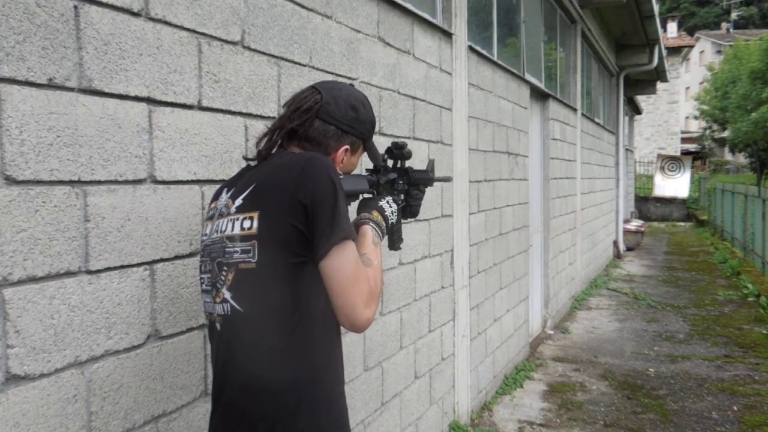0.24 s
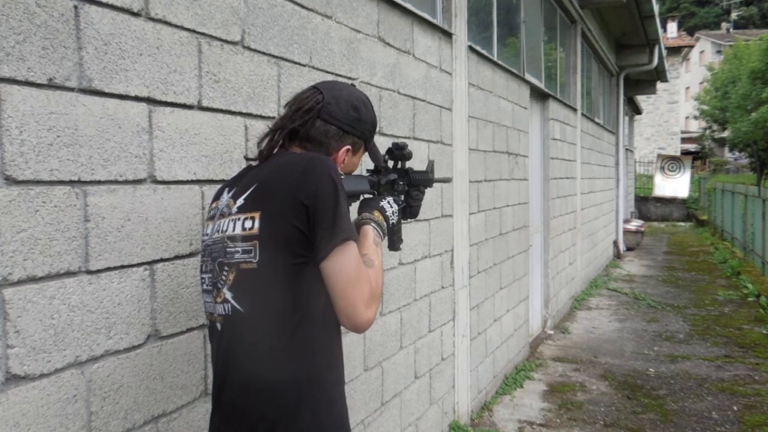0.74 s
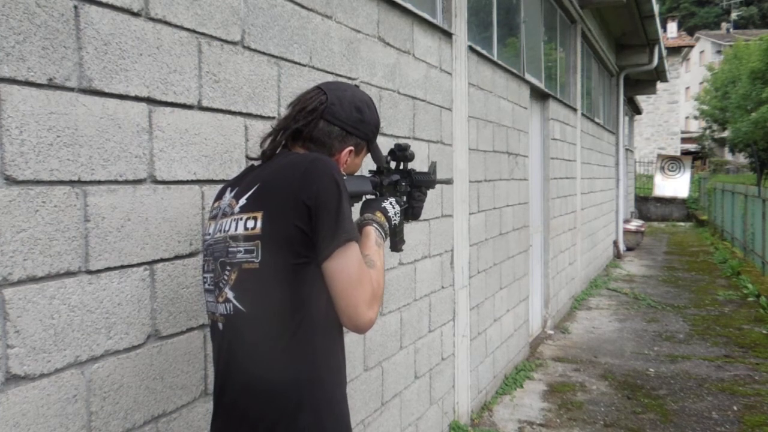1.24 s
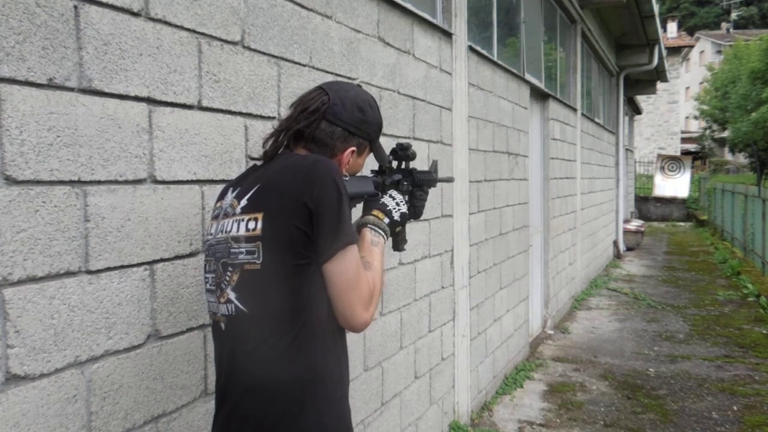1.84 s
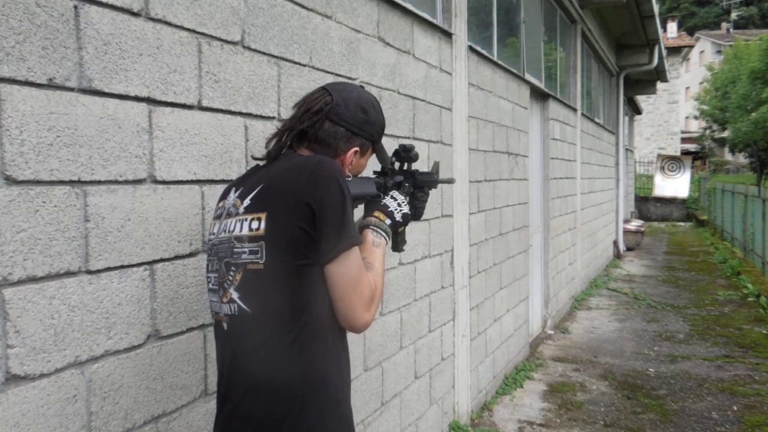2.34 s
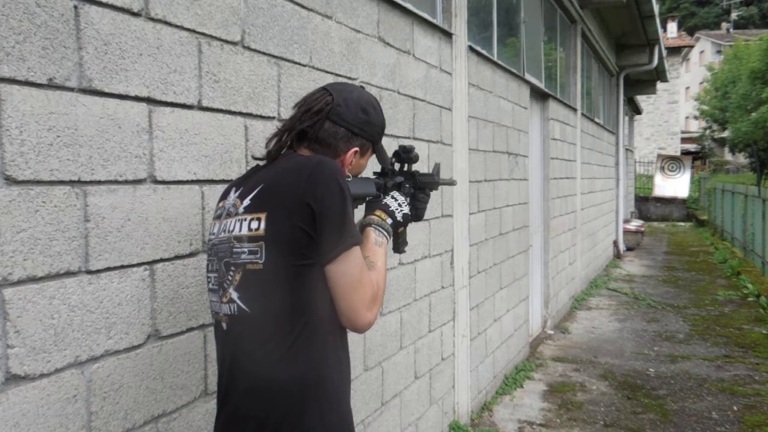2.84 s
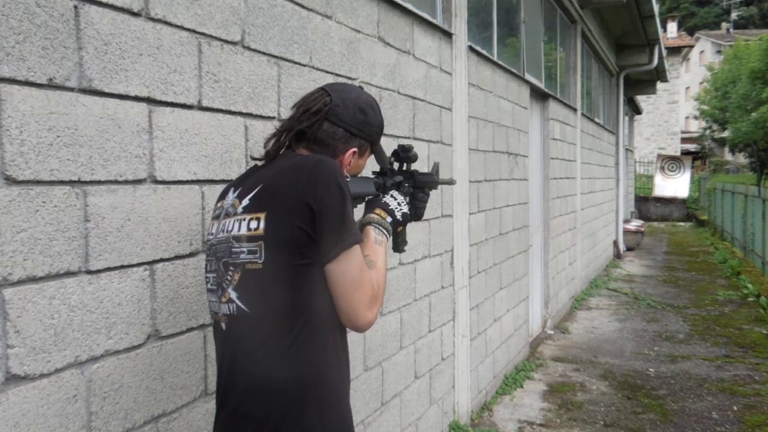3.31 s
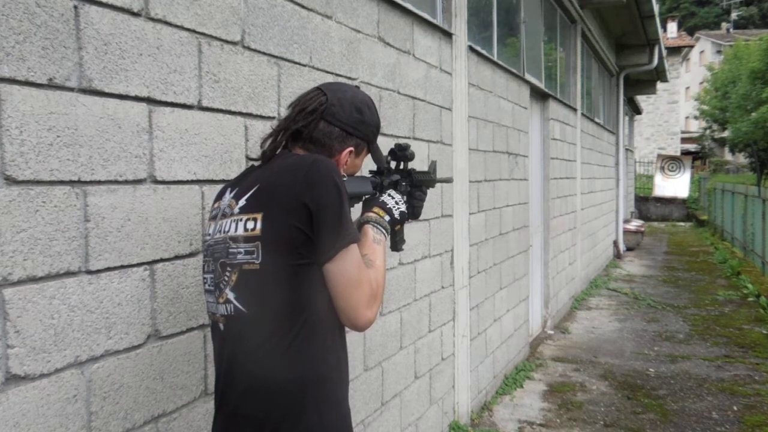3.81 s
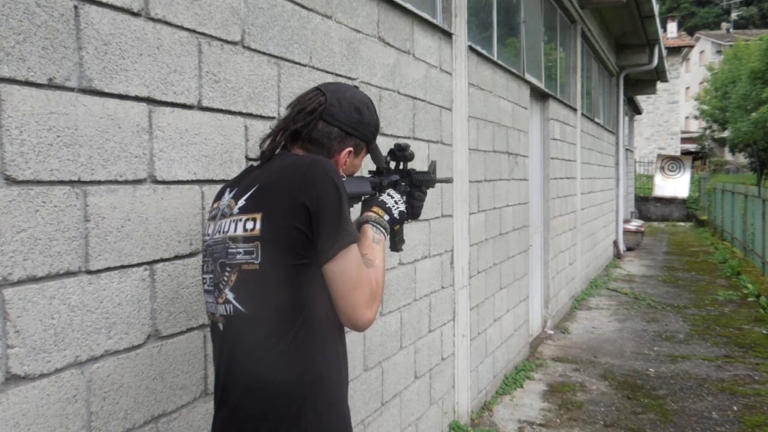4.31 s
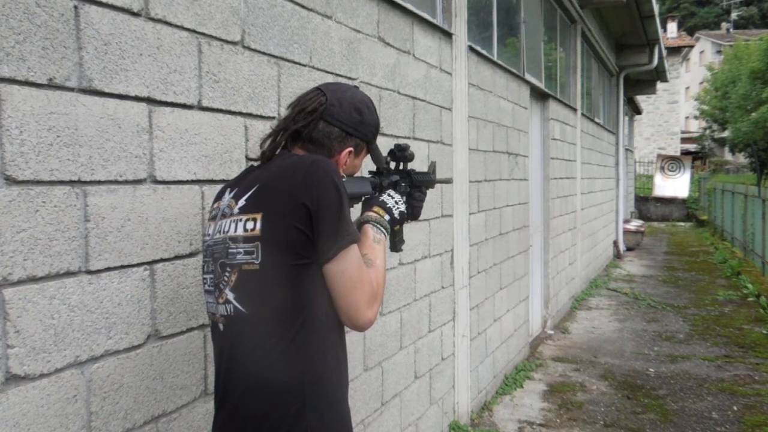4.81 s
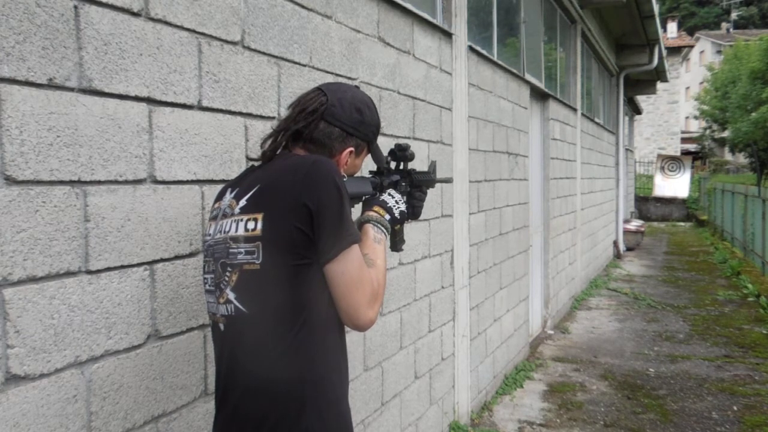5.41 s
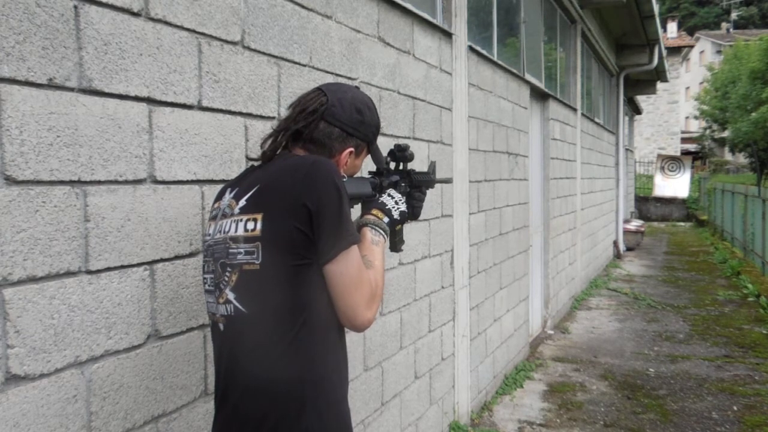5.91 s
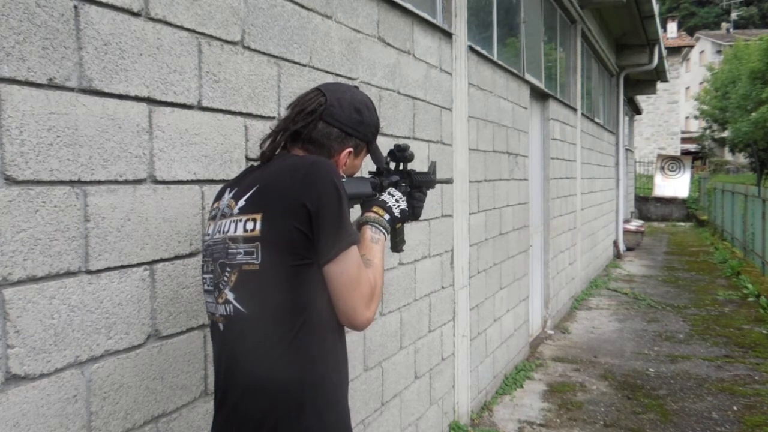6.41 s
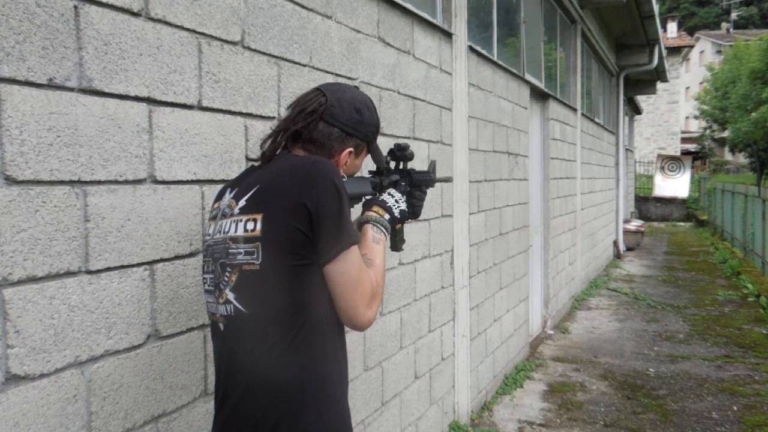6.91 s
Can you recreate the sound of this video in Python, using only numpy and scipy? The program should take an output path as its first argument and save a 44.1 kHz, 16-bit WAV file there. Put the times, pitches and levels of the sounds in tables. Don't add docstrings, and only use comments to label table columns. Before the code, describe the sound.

Outdoors in an alley beside a block wall, a close electric airsoft rifle fires nine brisk single shots, each a gear whirr, sharp crack and clatter. Distant pellet smacks follow. After a pause with a faint engine drone come four rapid bursts, two more shots and a final trigger click. The microphone is near the shooter; soft outdoor hum swells between volleys.

```python
import sys
import numpy as np
from scipy import signal
from scipy.fft import rfft, irfft, next_fast_len
from scipy.io import wavfile
from scipy.ndimage import uniform_filter1d

SR = 44100
rng = np.random.default_rng(int(sys.argv[2]) if len(sys.argv) > 2 else 0)


def amp(db):
    return 10 ** (np.asarray(db, float) / 20)


def write(x):
    x = np.atleast_2d(x).T
    wavfile.write(sys.argv[1], SR, np.round(np.clip(x, -1, 1) * 32767).astype(np.int16))


N = 315315
LEAD = SR // 10
CYCLE_S = .0614
SLOW_START_S = .0012
THUMP_SHARE = 0.74
SHAKE_DB = 2.0
EDGE_HZ = 14130

# (f/Hz, level/dB)
HUM_COLOUR = [(12, -17), (20, 4.5), (75, -4.5), (119, -1), (152, -3.5), (236, -7), (337, -2), (376, -14.5),
              (431, -4.5), (567, -14.5), (809, -11), (980, -15.5), (14000, -34.5)]
# (f/Hz, level/dB)
HUM_SIDE = [(60, -9.5), (180, -18.5), (540, -16.5), (1640, -13.5), (4920, -4.5), (14800, 3)]
# (level at rest/dB, drop per slam/dB, recovery/s)
HUM_GAIN = (-46, 4.43, 0.51)
# (t/s, f/Hz, level/dB)
ENGINE_NOTE = [(1.6, 164, -67), (1.604, 166, -64), (1.804, 173.5, -49), (1.826, 164, -57), (1.9, 162, -54),
               (1.966, 161.6, -70), (1.986, 175.7, -44.5), (2.12, 162, -64)]

# (t/s, snap level/dB, ringing tail level over snap/dB)
SINGLE_HITS = [(0.0856, -10, -17), (0.2436, -9.5, -19.5), (0.438, -10.5, -22), (0.5904, -13.5, -14.5),
               (0.7512, -13, -16), (0.9266, -13, -15.5), (1.1117, -9, -17.5), (1.264, -10, -15.5),
               (1.446, -12, -17), (1.6143, -15.5, -14.5), (1.79, -16, -12.5), (1.9464, -14.5, -11.5)]
# (first t/s, last t/s, snap level/dB, first tail level over snap/dB, last tail level over snap/dB)
BURST_HITS = [
    (3.2378, 3.5387, -12.5, -15, -12),
    (4.2326, 4.475, -10, -14.5, -14.5),
    (5.17, 5.412, -12.5, -15.5, -9.5),
    (6.113, 6.4187, -12, -16, -11.5),
]
# (t/s, level/dB)
STRAY_TICKS = [
    (0.1254, -16),
    (1.309, -36),
    (2.1944, -41),
]
# (f/Hz, level/dB)
SNAP_COLOUR = [(590, -35), (1000, -22), (1560, -27), (2580, -12), (2980, -23.5), (6460, -15), (9300, -5.5),
               (11000, 0.5), (13100, -3.5), (14000, -4.5)]
# (f/Hz, level/dB)
ALLEY_COLOUR = [(120, -48), (200, -11), (306, -2.5), (522, -10), (906, -11.5), (1250, -9), (1750, -4),
                (2130, -15.5), (2450, -5), (2830, -6), (6400, -6), (10200, -3), (14000, -5)]
# (f/Hz, level/dB)
YARD_COLOUR = [(150, -28), (400, 0.5), (1000, 3.5), (1600, 2), (2600, -2.5), (6000, -14.5), (14000, -38)]
# (f/Hz, level/dB, time to fade by 60 dB t/s)
TARGET_NOTES = [(299.5, -1.5, 1), (787, -2, 1), (1065, 4.5, 0.29), (1515, 2.5, 0.25), (1510, 0, 0.53),
                (1690, 8, 0.69), (1820, -1, 0.24), (2500, 7, 0.45), (2650, -12, .3), (3550, 5, 0.6),
                (3378, -24, 0.39), (3800, -0.5, 0.34)]
# (f/Hz, level/dB)
FAR_WIDTH = [(60, 8), (130, -34), (290, -35.5), (640, -35), (1400, -29), (4300, -31), (6300, -5),
             (14800, -1)]

# (delay t/s, level over crack/dB)
ECHOES = [
    (0.07, -35.5),
    (0.13, -43),
]
# (f/Hz, level/dB)
ECHO_COLOUR = [(300, -41), (650, -7.5), (960, -0.5), (1500, -9.5), (2600, -13), (5000, -24)]
# (t/s, level/dB)
RATTLES = [(3.1944, -43), (5.0875, -33.5), (5.145, -44), (6.0581, -42), (6.074, -39), (6.0895, -33),
           (7.093, -26)]
# (f/Hz, level/dB)
RATTLE_COLOUR = [(400, -29), (1300, -5), (3000, -6), (4500, -6.5), (9000, -36)]

# (t/s, tick level/dB)
PULLS = [(0.077, -22), (0.2448, -23), (0.419, -26.5), (0.601, -30), (0.759, -28), (0.9373, -33),
         (1.106, -23), (1.284, -25.5), (1.437, -27), (2.733, -10), (3.7314, -23), (4.6733, -24),
         (5.6125, -22.5), (6.751, -17.5), (6.979, -22)]
# (t/s, tick level/dB)
LAST_PULL = (7.158, -17.5)
# (time before slam t/s, level/dB, width/s)
TURN_BUMPS = [(0.03, 7, 0.0036), (0.0081, 7, 0.003)]
# (f/Hz, level/dB)
WHIRR_COLOUR = [(120, -69), (200, -25), (430, -8.5), (613, -10.5), (786, 2), (1040, -5), (1180, 1),
                (1290, -5.5), (2590, 0), (3040, -2), (3440, 4), (6070, -4.5), (14000, -1.5)]
# (f/Hz, level/dB)
PICK_UP_COLOUR = [(180, -59), (300, -25), (1020, -10), (2390, -5), (4120, 0.5), (6070, -5), (7240, -26),
                  (9370, -3.5), (14000, -10)]
# (rise t/s, hold t/s, time to fade by 60 dB t/s)
PICK_UP_SHAPE = (.0005, .002, .03)

# (t/s, crack level/dB)
SINGLES = [(0.135, -3.5), (0.3021, -5), (0.4767, -6.5), (0.66, -8), (0.819, -7.5), (0.9961, -7),
           (1.165, -4), (1.3411, -6), (1.498, -8), (6.81, 4), (7.0384, 1.5)]
# (first slam t/s, last slam t/s, first crack level/dB, last crack level/dB)
BURSTS = [
    (2.7882, 3.095, 8, -6),
    (3.7925, 4.0365, 0.6, -5),
    (4.733, 4.9777, -4.5, -6.5),
    (5.674, 5.979, 2, -5),
]
# (t/s, crack level/dB, clatter level over crack/dB)
EARLY_SLAM = (-0.035, -0.5, -2.8)
# (clatter, whirr, thump level over crack/dB)
FROM_REST = (-11.5, -20.5, -23)
# (clatter, whirr, thump level over crack/dB)
AT_SPEED = (-10, -16.5, -22.5)
# (f/Hz, level/dB)
CRACK_COLOUR = [(180, -26), (300, -57.5), (1450, -14), (1910, -7.5), (2630, -10), (3750, -10.5), (5080, -4),
                (7240, -9.5), (8500, -1.5), (9220, 0), (9990, -4), (10700, -3), (14000, -2)]
# (rise t/s, hold t/s, time to fade by 60 dB t/s)
CRACK_SHAPE = (.0007, .0017, .02)
# (f/Hz, level/dB)
CLATTER_COLOUR = [(120, -34.5), (200, -3.5), (541, -5.5), (786, -0.5), (1460, -3), (1720, 3.5), (2130, 0),
                  (3500, 3.5), (3890, -2.5), (4820, 2.5), (7510, -3), (8360, -1), (14000, 0)]
# (f/Hz, level/dB, time to fade by 60 dB t/s)
BODY_NOTES = [(67, -51, 0.041), (101.3, -0.5, 0.18), (121, -6.5, 0.24), (201.7, 4.5, 0.1), (437, 1.5, 0.14),
              (647, -6, 0.16), (722, 1.5, 0.084), (845, -9, 0.17), (1136.5, 2, 0.19), (1484, -1, 0.13)]
# (f/Hz, level/dB, time to fade by 60 dB t/s)
SHELL_NOTES = [(745, -13, .03), (1100, -9, .04), (1452, -9, .05), (2473, -9, .04), (3069, -10, .03),
               (3442, -11, .03), (8445, -2, .025), (9110, -9, .015), (9990, -9, .015), (11800, -8, .012),
               (12500, -7, .012), (13675, -4, .012)]
# (f/Hz, level/dB)
RIFLE_WIDTH = [(60, -11.5), (130, -21), (290, -33), (640, -57), (1400, -70), (5000, -47), (7400, -10),
               (14800, -13.5)]
# (f/Hz, level/dB)
LEAN = [(60, .4), (200, 0), (6000, 0), (7600, -2.1), (14800, -1.8)]


def read(points, hz):
    f, value = np.transpose(points)
    return np.interp(np.log(hz + 1), np.log(f + 1), value)


def colour(points):
    db = read(points, abs(np.fft.fftfreq(4096, 1 / SR)))
    spectrum = np.exp(np.conj(signal.hilbert(np.log(amp(db)))))
    return np.fft.ifft(spectrum).real[:2048]


def evened(x):
    return x / np.sqrt(np.mean(x ** 2) + 1e-20)


def summed(*shapes):
    longest = max(map(len, shapes))
    return sum(np.pad(shape, (0, longest - len(shape))) for shape in shapes)


def struck(s, db, shape):
    train = np.zeros(N + 3 * LEAD)
    np.add.at(train, LEAD + np.round(np.asarray(s) * SR).astype(int), amp(db))
    return signal.oaconvolve(train, shape)[LEAD:LEAD + N]


def fading(rise, hold, t60, after=0.):
    t = np.maximum(np.arange(round((after + hold + t60) * SR)) / SR - after, 0)
    return (1 - np.exp(-t / rise)) ** 2 * amp(-120 * np.maximum(t - hold, 0) / t60)


def burst(s, db, power, points, grit_db, wide):
    fine, coarse = rng.standard_normal((2, N))
    fine = evened(uniform_filter1d(fine, size=40))
    coarse = evened(uniform_filter1d(coarse, size=220))
    grit = amp(grit_db * evened(fine + 1.45 * coarse))
    envelope = np.sqrt(np.maximum(struck(s, 2 * np.asarray(db), power), 0)) * evened(grit)
    mid, side = envelope * rng.standard_normal((2, N))
    taps = colour(points)
    side_taps = np.convolve(taps, colour(wide))
    mid = signal.oaconvolve(mid, taps)[:N]
    side = signal.oaconvolve(side, side_taps)[:N]
    return np.array([mid, side]) / np.linalg.norm(taps)


def ring(modes, rise):
    t = np.arange(SR // 2) / SR
    sound = sum(amp(db - 60 * t / t60) * np.sin(2 * np.pi * hz * t) for hz, db, t60 in modes)
    sound *= 1 - np.exp(-(t / rise) ** 2)
    return sound / abs(sound).max()


def knocked(s, db, modes, rise, detune=.012):
    out = np.zeros(N + 2 * SR)
    draws = rng.standard_normal((len(s), 2, len(modes)))
    hz, mode_db, t60 = np.transpose(modes)
    for at, level_db, (mix, tune) in zip(s, db, draws):
        sound = ring(zip(hz * (1 + detune * tune), mode_db + SHAKE_DB * mix, t60), rise)
        out[LEAD + round(at * SR):][:len(sound)] += amp(level_db) * sound
    return out[LEAD:LEAD + N]


def spread_out(first, last, first_db, last_db):
    count = round((last - first) / CYCLE_S) + 1
    return np.linspace([first, first_db], [last, last_db], count)


def slams():
    rows = [(*row, *FROM_REST) for row in SINGLES]
    for volley in BURSTS:
        (s, db), *rest = spread_out(*volley)
        rows.append((s, db, *FROM_REST))
        rows += [(s + SLOW_START_S, db, *AT_SPEED) for s, db in rest]
    return rows


def hits():
    rows = list(SINGLE_HITS)
    for first, last, db, *tails in BURST_HITS:
        rows += [(s, db, tail_db) for s, tail_db in spread_out(first, last, *tails)]
    return rows


def hum():
    hz = np.fft.rfftfreq(N, 1 / SR)
    mid, side = rfft(rng.standard_normal((2, N))) * amp(read(HUM_COLOUR, hz))
    low = np.sqrt(2 * np.sum(abs(mid[(hz > 30) & (hz < 400)]) ** 2)) / N
    pair = irfft(np.array([mid, side * amp(read(HUM_SIDE, hz))]), N) / low
    waver_db = .8 * evened(uniform_filter1d(rng.standard_normal(N), size=3000))
    rest_db, drop_db, recovery = HUM_GAIN
    times = [row[0] for row in slams()] + [-.028]
    load = struck(times, 0, np.exp(-np.arange(3 * SR) / SR / recovery))
    load = np.sqrt(uniform_filter1d(abs(load), size=400))
    return pair * amp(rest_db - drop_db * load + waver_db)


def drone():
    s, hz, db = np.transpose(ENGINE_NOTE)
    t = np.arange(N) / SR
    level = amp(np.interp(t, s, db, -100, -100)) * np.sqrt(2)
    return level * np.sin(2 * np.pi * np.cumsum(np.interp(t, s, hz)) / SR)


def returns():
    s, db = np.transpose(slams())[:2]
    sound = burst(s, db - 37.5, fading(0.0192, 0.025, 0.41), ALLEY_COLOUR, grit_db=4.0, wide=FAR_WIDTH)
    echoes = [(s + delay, db + loss_db) for delay, loss_db in ECHOES]
    echo_s, echo_db = np.concatenate(echoes, axis=1)
    sound += burst(echo_s, echo_db, fading(0.0022, 0.0024, 0.1), ECHO_COLOUR, grit_db=-3.5, wide=RIFLE_WIDTH)
    s, db = np.transpose(RATTLES)
    settling = fading(.0005, 0.0016, 0.035)
    return sound + burst(s, db - 7.0, settling, RATTLE_COLOUR, grit_db=2.5, wide=RIFLE_WIDTH)


def target():
    s, db, tail_db = np.transpose(hits())
    smear = summed(fading(.0002, 0.0062, 0.035),
                   amp(-23) * fading(.002, 0.0067, 0.093),
                   amp(-20.5) * fading(.0005, 0.0024, 0.058, after=0.045))
    sound = burst(s, db - 8.0, smear, SNAP_COLOUR, grit_db=-3.5, wide=FAR_WIDTH)
    tail_db = db + tail_db
    sound += burst(s, tail_db - 3.5, fading(0.00022, 0.0095, 0.44), ALLEY_COLOUR, grit_db=1.5, wide=FAR_WIDTH)
    sound += burst(s, tail_db - 22.5, fading(0.02, 0.061, 1.28), YARD_COLOUR, grit_db=-0.5, wide=FAR_WIDTH)
    sound[0] += knocked(s, tail_db - 10.0, TARGET_NOTES, rise=0.0027, detune=.002)
    return sound


def stray_ticks():
    s, db = np.transpose(STRAY_TICKS)
    return burst(s, db - 1.0, fading(0.00033, 0.0018, 0.0382), SNAP_COLOUR, grit_db=-11.5, wide=RIFLE_WIDTH)


def gears():
    before = np.arange(round(.06 * SR), 0, -1) / SR
    load = amp(3.0) + 1 / (1 + np.exp((before - .034) / 0.0058))
    load *= 1 - 0.24 * np.exp(-(before / 0.0029) ** 2)
    bumps = sum(amp(2 * db) * np.exp(-((before - at) / width) ** 2) for at, db, width in TURN_BUMPS)
    s, db, _, whirr_db, _ = np.transpose(slams())
    whirr = burst(s - .06, db + whirr_db - 9.0, load + bumps, WHIRR_COLOUR, grit_db=2.1, wide=RIFLE_WIDTH)
    s, db = np.transpose(PULLS + [LAST_PULL])
    spin_up = amp(-1.3e3 * np.arange(round(.022 * SR), 0, -1) / SR)
    dull_whirr = WHIRR_COLOUR[:9] + [(4200, -4), (14000, -26)]
    start = burst(s - .022, db - 15.5, spin_up, dull_whirr, grit_db=-7.0, wide=RIFLE_WIDTH)
    tick = burst(s, db + 0.31, fading(*PICK_UP_SHAPE), PICK_UP_COLOUR, grit_db=1.5, wide=RIFLE_WIDTH)
    return whirr + start + tick


def piston():
    s, db, clatter_db, _, thump_db = np.transpose(slams() + [(*EARLY_SLAM, 0, -24)])
    sound = burst(s, db - 1.0, fading(*CRACK_SHAPE), CRACK_COLOUR, grit_db=1.4, wide=RIFLE_WIDTH)
    rattle = summed(fading(0.0021, 0.011, 0.044, after=0.0096),
                    amp(-0.5) * fading(0.0015, 0.0069, 0.15, after=0.0061))
    sound += burst(s, db + clatter_db - 8.0, rattle, CLATTER_COLOUR, grit_db=0.5, wide=RIFLE_WIDTH)
    thump_db = THUMP_SHARE * db + thump_db
    sound[0] += knocked(s, thump_db, BODY_NOTES, rise=0.0029)
    sound[0] += knocked(s + .014, thump_db - 7.5, BODY_NOTES, rise=0.0027)
    return sound


def scene():
    wash, spread = hum()
    far = drone()
    rifle = piston() + gears()
    rifle[0] += amp(-26.0) * signal.oaconvolve(rifle[0], ring(SHELL_NOTES, rise=.0001))[:N]
    mid, side = rifle + returns() + target() + stray_ticks()
    size = next_fast_len(N)
    lean = amp(read(LEAN, np.fft.rfftfreq(size, 1 / SR)) / 2)
    left, right = irfft(rfft([mid + side, mid - side], size) * [lean, 1 / lean], size)[:, :N]
    return np.array([left + spread, right - spread]) + wash + far


def low_pass(x):
    return signal.sosfilt(signal.butter(12, 15410, fs=SR, output="sos"), x)


def record(dry):
    hot = np.clip(dry, -1.1, 1.1)
    steep_taps = signal.firwin(601, EDGE_HZ, window=("kaiser", 9), fs=SR)
    loose_taps = signal.firwin(61, EDGE_HZ, window=("kaiser", 4.5), fs=SR)
    steep = signal.oaconvolve(hot, steep_taps[None], "same")
    loose = signal.oaconvolve(hot, loose_taps[None], "same")
    attacks = np.array([row[0] for row in slams() + hits() + PULLS])
    leak = np.minimum(struck(attacks - .006, -11.0, np.hanning(700)), 1)
    mix = np.clip(steep + leak * (loose - steep), -1, 1)
    return low_pass(mix)


dry = scene()
out = record(dry)
write(out)
```